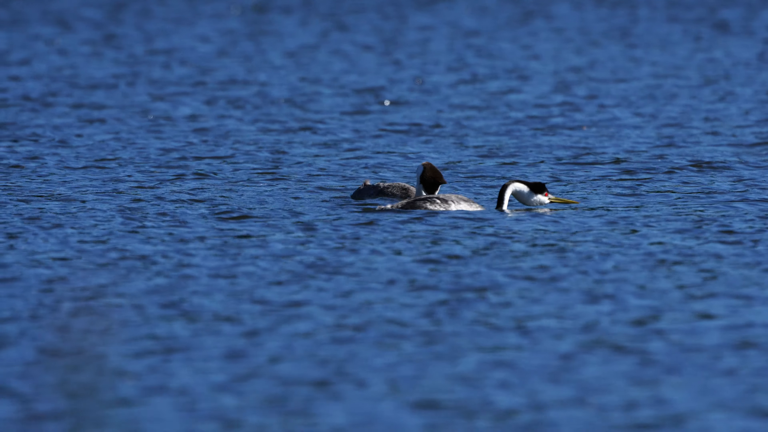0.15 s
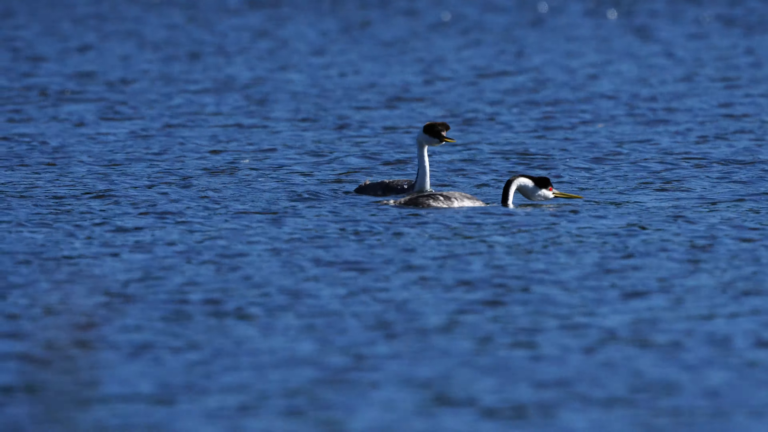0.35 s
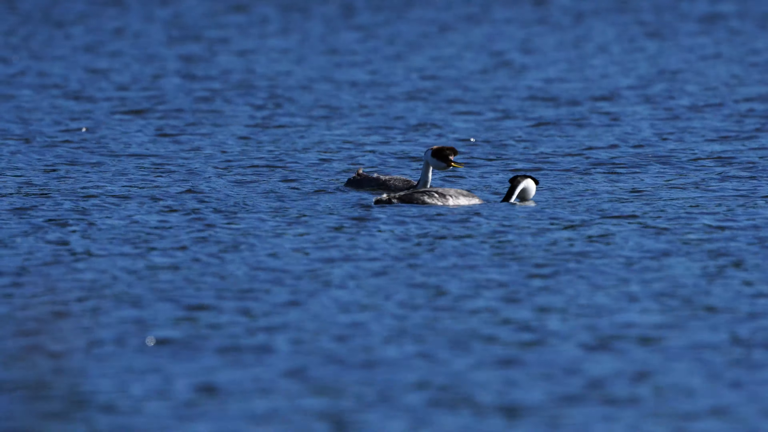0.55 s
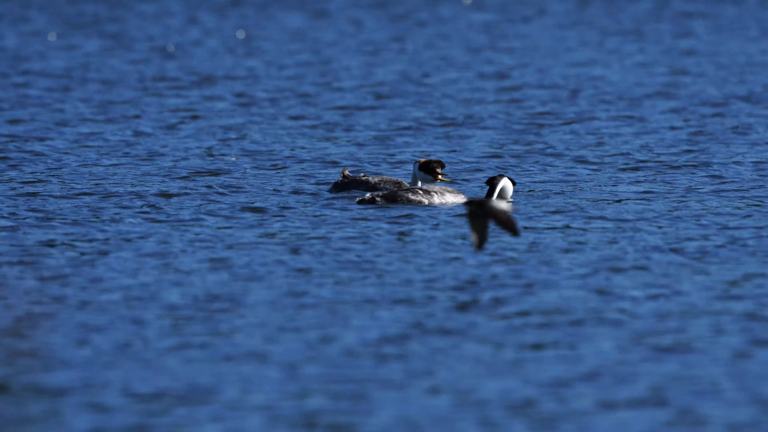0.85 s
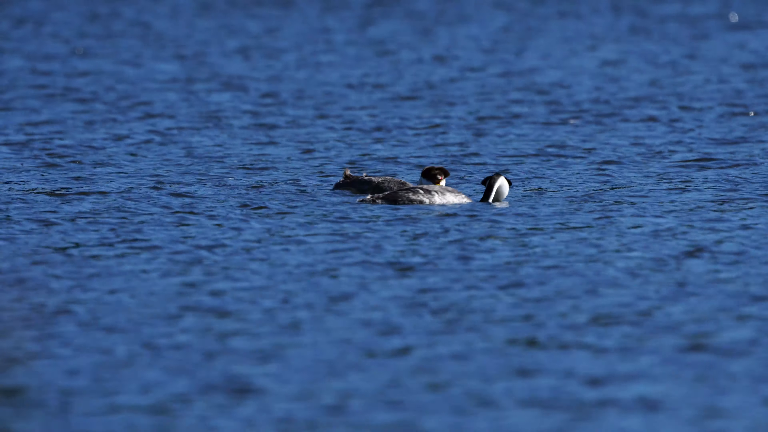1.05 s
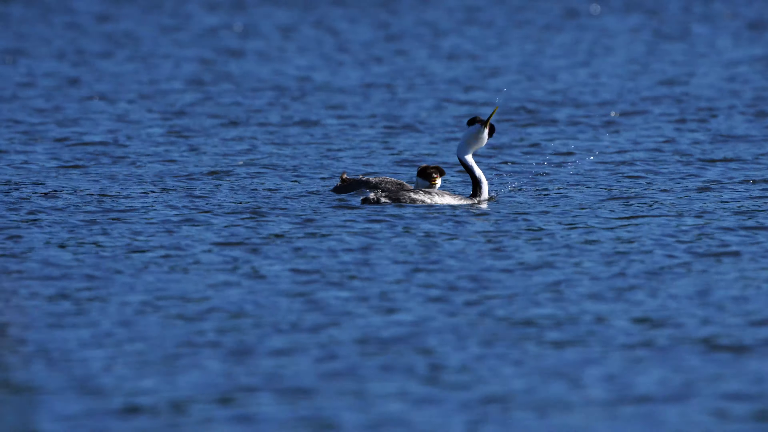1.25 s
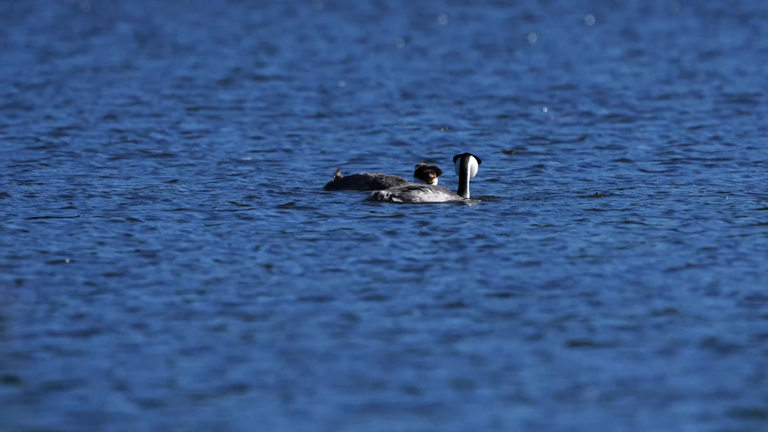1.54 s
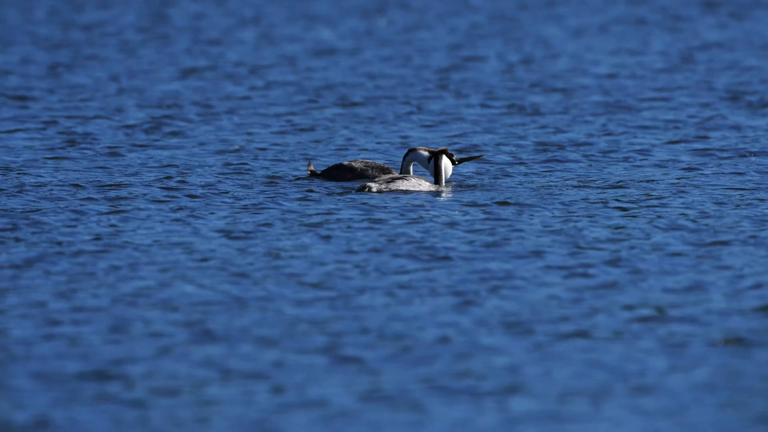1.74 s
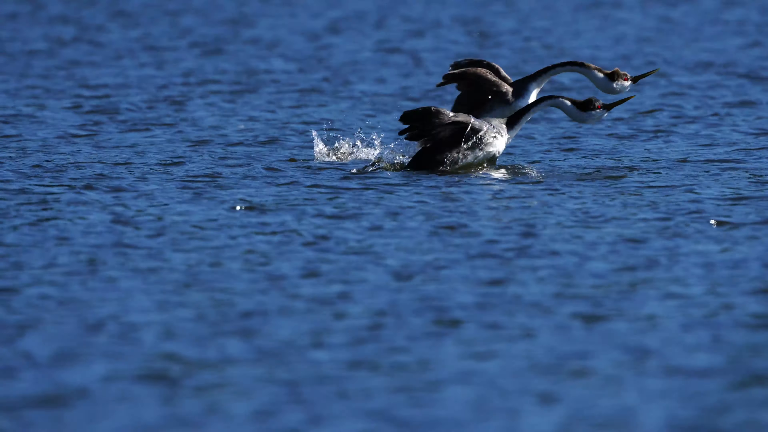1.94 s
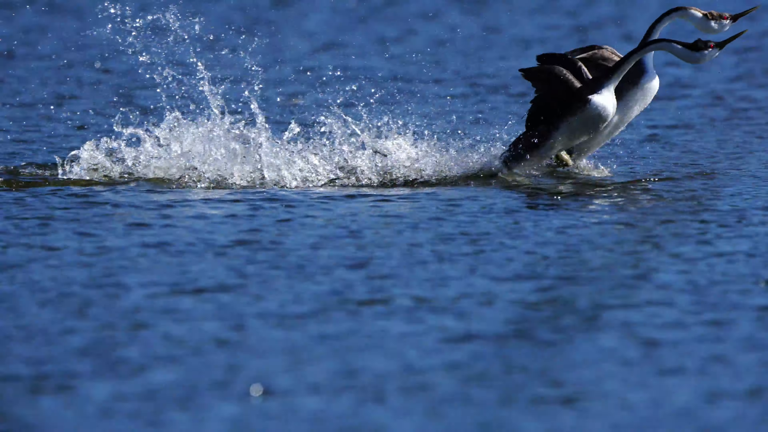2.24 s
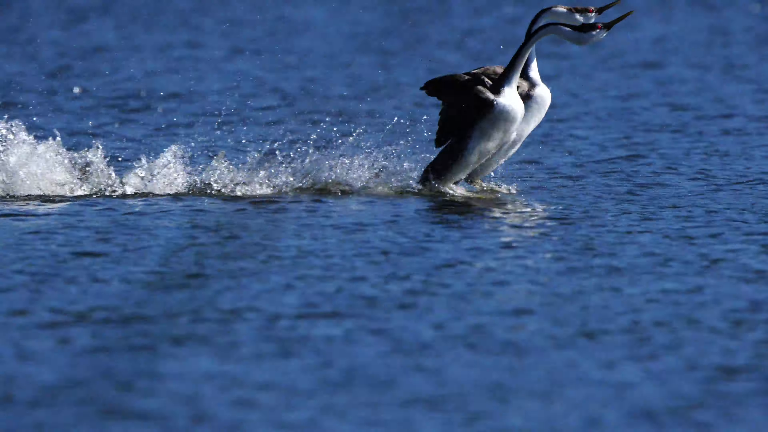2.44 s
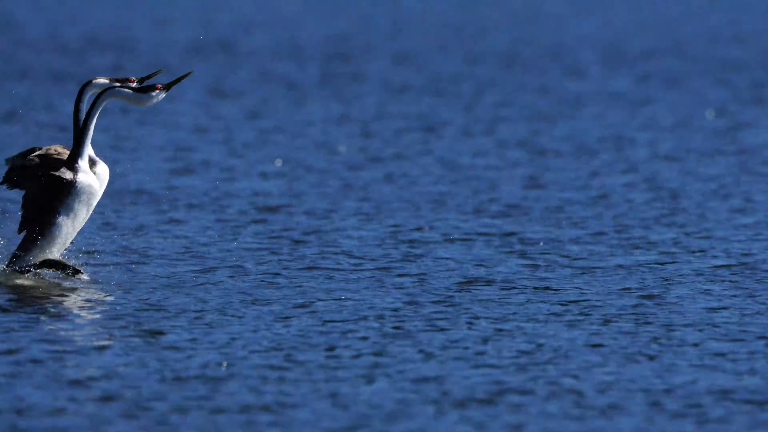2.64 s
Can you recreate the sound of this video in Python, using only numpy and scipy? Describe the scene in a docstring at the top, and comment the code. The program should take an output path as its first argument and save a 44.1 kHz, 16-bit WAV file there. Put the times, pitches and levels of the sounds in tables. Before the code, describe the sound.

On an open lake, waterbirds rattle in two bouts of dry clicking chirps with faint wavering calls farther off; the wind buffets an unshielded microphone throughout, and sharp foot slaps and fine spray close it.

```python
"""Rattling trills of grebes come first, over buffeting wind and the hiss of wavelets on an open lake.
Each trill is a run of tiny chirps, mostly rising: short tones with an octave above them.
Later the birds rear up and patter across the water: sharp noise slaps with splashes and falling drops.
Faint wavering notes come from farther out. The wind is shaped noise that hits the two microphone
ports a little out of step, with single pops of pressure; the hiss is wide, shaped noise."""
import sys
import numpy as np
from scipy import signal
from scipy.fft import rfft, irfft
from scipy.io import wavfile
from scipy.ndimage import uniform_filter1d

SR = 44100
rng = np.random.default_rng(int(sys.argv[2]) if len(sys.argv) > 2 else 0)


def transcribe(u):
    """Save the signal u as a 16-bit wav file named by the first command-line argument.

    u: samples, shape (n,) or (channels, n), limited to [-1, 1]; the rate is SR.
    q: integer samples, one column per channel.
    """
    v = np.clip(np.atleast_2d(u).T, -1, 1)
    q = np.round(v * 32767).astype(np.int16)
    wavfile.write(sys.argv[1], SR, q)


N = 123039
TIME = np.arange(N) / SR
HZ = np.fft.rfftfreq(N, 1 / SR)

# Levels in these tables are starting levels; the functions may raise or lower them.
# wavelet hiss, with a few brief dips: (time [s], level [dB])
HISS_LEVEL = [(0, -45), (.12, -41.5), (.16, -48.5), (.24, -44), (.45, -42.5), (.9, -41.5), (1.4, -38),
              (1.78, -38.5), (1.91, -42.5), (1.99, -40), (2.04, -45.5), (2.17, -38.5), (2.22, -44.5),
              (2.35, -41), (2.79, -39.5)]
# tone colour of the hiss: (frequency [Hz], relative level [dB])
HISS_COLOUR = [(100, -42), (500, 1.5), (900, 8.5), (1500, 4.5), (2500, 4), (4000, 2), (5500, -1.5),
               (6800, -3.5), (8500, -1), (10500, -2.5), (13000, -5), (15600, -4.5)]
# how alike the hiss is left and right: (frequency [Hz], likeness [-1 to 1])
HISS_LIKENESS = [(200, 1), (1400, 0.32), (3000, -0.25), (15000, 0.15)]
# deep sway of the air, even in the lulls: (frequency [Hz], relative level [dB])
SWAY_COLOUR = [(8, -18), (25, -4), (45, -2), (70, 1), (110, -16.5), (200, -38), (500, -49), (16000, -100)]
# steady push of the wind: (time [s], level [dB])
WIND_LEVEL = [(0, -28.5), (.06, -36), (.16, -28.5), (.23, -30), (.36, -33.5), (.52, -34), (.6, -41.5),
              (.7, -33), (.77, -25), (.85, -32.5), (.92, -28.5), (1.14, -28), (1.19, -35), (1.28, -29),
              (1.62, -27), (1.78, -26.5), (2.04, -28), (2.3, -26), (2.55, -25), (2.6, -25), (2.67, -26),
              (2.79, -28)]
# tone colour of the steady wind: (frequency [Hz], relative level [dB])
WIND_COLOUR = [(10, -21), (30, -5), (60, -2), (110, -0.5), (180, -4.5), (280, -9), (450, -19), (700, -27.5),
               (1200, -37), (3000, -53.5), (16000, -99)]
# gusts that hit the microphone: (centre time [s], half length [s], level [dB])
GUSTS = [(0.131, .022, -28.5), (0.775, 0.022, -28.5), (0.882, 0.012, -30), (0.939, 0.017, -31),
         (1.046, 0.012, -33.5), (1.125, 0.03, -37), (1.339, 0.026, -32), (1.411, 0.0057, -18.5),
         (1.721, 0.021, -32), (1.796, 0.025, -28), (1.878, 0.034, -25.5), (1.961, 0.011, -21.5),
         (2.021, 0.017, -20.5), (2.086, 0.021, -27.5), (2.241, 0.07, -26.5), (2.413, 0.0088, -28),
         (2.453, 0.0097, -26.5), (2.586, 0.017, -26.5), (2.744, 0.028, -33)]
# tone colour of the gusts: (frequency [Hz], relative level [dB])
GUST_COLOUR = [(25, -5), (80, -15), (160, 4), (300, -1), (480, -3.5), (680, -18.5), (900, -25), (1200, -63),
               (1600, -49), (3000, -72), (16000, -91)]
# lead of the left port over the right: (frequency [Hz], phase [radians])
PORT_PHASE = [(0, -0.71), (60, 0.1), (130, -0.98), (260, -1.31), (600, -2), (1120, -1.7)]
# strength of the left port over the right: (frequency [Hz], left minus right [dB])
PORT_BALANCE = [(60, 0), (150, -0.5), (380, 2.5), (700, 4.5), (1300, 16.5)]
# single eddies that pop against the ports: (centre time [s], level [dB], length [s])
POPS = [(.116, -13.5, 0.0011), (0.131, -14, 0.001), (0.144, -10, 0.00087), (.162, -9.5, .0018),
        (.741, -16, 0.0022), (0.759, -14.5, 0.00088), (0.774, -22, 0.0026), (0.786, -16.5, 0.0011),
        (0.801, -18.5, 0.001), (.934, -14, 0.0018), (0.965, -13, 0.00094), (1.043, -11, .0011),
        (1.109, -14, 0.0021), (1.152, -10, .0011), (1.239, -11, 0.0016), (1.329, -14, .001),
        (1.538, -13.5, 0.0014), (1.582, -10, 0.0014), (1.68, -11.5, 0.0017), (1.695, -13.5, 0.0012),
        (1.756, -16, 0.00067), (1.8, -18, 0.001), (1.836, -11.5, 0.002), (1.856, -8.5, 0.00071),
        (1.877, -6, 0.00078), (1.898, -15.5, 0.00069), (1.904, -9.5, 0.002), (1.95, -19, 0.0006),
        (1.968, -22, 0.00098), (2.013, -13, 0.00098), (2.02, -22, 0.0012), (2.031, -12, 0.00058),
        (2.089, -17, 0.0007), (2.138, -12, 0.0012), (2.192, -10.5, 0.00067), (2.2, -15.5, 0.00067),
        (2.206, -11, 0.0013), (2.212, -17, 0.00099), (2.222, -11.5, 0.0014), (2.254, -14.5, 0.0017),
        (2.266, -9.5, 0.00074), (2.273, -13, 0.00069), (2.281, -9, 0.0015), (2.361, -19, 0.00068),
        (2.415, -11.5, 0.0012), (2.453, -8.5, 0.00075), (2.461, -13, 0.00087), (2.577, -18, 0.00093),
        (2.585, -8.5, 0.0017), (2.593, -13, 0.0016), (2.6, -9.5, 0.0013), (2.631, -14.5, 0.0029),
        (2.699, -15, .002)]
# faint calls of birds farther off: (time [s], length [s], level [dB], pitch [Hz], wobble [radians])
FAR_CALLS = [(0.869, 0.034, -45, 1950, 2), (1.017, 0.035, -38, 1796, 1.3), (1.182, 0.04, -37.5, 1884, 1.2),
             (1.273, .018, -40.5, 1740, 1), (1.372, 0.036, -36, 1922, 1.4), (1.554, 0.015, -33, 2003, 0.49),
             (2.483, 0.04, -51, 5760, .8)]
# feet slapping the water: (time [s], level [dB], left minus right [dB])
SLAPS = [(2.026, -40, 0), (2.1408, -29.5, 4), (2.387, -35, -2), (2.411, -44, -2), (2.5474, -24, -7),
         (2.602, -27, -1), (2.6591, -24.5, -3), (2.719, -30, -5), (2.7743, -25.5, -2)]
# tone colour of slaps and drops: (frequency [Hz], relative level [dB])
SLAP_COLOUR = [(300, 3), (900, -4.5), (1800, -2), (2700, -10), (4200, -31), (9000, -32)]
# chirps of the trills: (time [s], length [s], level [dB], middle pitch [Hz], octave overtone [dB])
CHIRPS = [(0, 0.011, -26.5, 2350, -19), (0.0528, 0.0032, -28.5, 2460, -27),
          (0.0605, 0.0069, -28, 2230, -14), (0.072, 0.0022, -23, 2270, -23),
          (0.082, 0.0035, -30, 2370, -23), (0.0938, 0.0038, -20.5, 2350, -20.5),
          (0.103, 0.002, -28.5, 2870, -29), (0.1152, 0.0034, -31, 2140, -16),
          (0.124, 0.0058, -28.5, 2500, -26), (0.1471, 0.005, -28, 2270, -21),
          (0.1536, 0.0026, -23.5, 2530, -21), (0.1615, 0.0026, -30, 2750, -27),
          (0.1815, 0.0037, -28, 2550, -35), (0.188, 0.0031, -23, 2330, -21),
          (0.2112, 0.0016, -19.5, 2480, -16), (0.2176, 0.0083, -24.5, 2300, -22.5),
          (0.2447, 0.0041, -23, 2370, -18), (0.255, 0.0017, -24, 2670, -29),
          (0.2698, 0.0044, -27.5, 1940, -8.5), (0.2767, 0.0028, -20.5, 2390, -18),
          (0.28, 0.0041, -25, 2280, -20), (0.3162, 0.0032, -22.5, 2070, -19),
          (0.322, 0.0063, -28, 2240, -20), (0.36, 0.00076, -17.5, 2840, -24),
          (0.3686, 0.0017, -19.5, 2120, -17), (0.422, 0.0025, -27.5, 2280, -19),
          (0.426, 0.0018, -31, 2300, -15), (0.4566, 0.003, -27.5, 2290, -33),
          (0.4844, 0.004, -30.5, 2380, -26), (0.498, 0.0032, -35, 2540, -28),
          (0.502, 0.0027, -29, 2440, -32), (0.523, 0.0034, -27.5, 2200, -15),
          (0.564, 0.0026, -25.5, 2420, -28), (0.5881, 0.0045, -27.5, 2266, -17),
          (0.5934, 0.0052, -28, 2225, -13.5), (0.5995, 0.0031, -30, 2370, -18),
          (0.6014, 0.0022, -29.5, 2500, -22), (0.6534, 0.0042, -21, 2366, -22),
          (0.6628, 0.0046, -23.5, 2420, -22), (0.7275, 0.003, -22.5, 2080, -33),
          (0.7301, 0.0065, -27, 2320, -28), (0.738, 0.0036, -23, 2425, -31),
          (0.8343, 0.0049, -21.5, 2403, -42), (1.215, 0.0046, -25.5, 2230, -19),
          (1.2209, 0.0084, -23.5, 2296, -20), (1.237, 0.0037, -22.5, 2260, -26),
          (1.2455, 0.0032, -24, 2360, -26), (1.2733, 0.0029, -22, 2260, -23),
          (1.2776, 0.0041, -29, 2160, -19), (1.282, 0.0037, -26, 2300, -19), (1.285, 0.002, -30, 2300, -6),
          (1.311, 0.0046, -24, 2435, -15), (1.34, 0.0044, -31, 2560, -16),
          (1.343, 0.0023, -28, 2580, -10.5), (1.3667, 0.0027, -20, 2600, -19),
          (1.3748, 0.0033, -24, 2740, -23), (1.3942, 0.005, -26, 2500, -26),
          (1.4, 0.0042, -29.5, 2300, -11), (1.4026, 0.0048, -24.5, 2550, -21),
          (1.4247, 0.0034, -24, 2760, -19), (1.429, 0.0058, -26, 2260, -20),
          (1.433, 0.0026, -21.5, 2660, -19), (1.452, 0.0038, -24, 2510, -20),
          (1.458, 0.0051, -24, 2570, -15.5), (1.473, 0.0031, -27, 2300, -19),
          (1.483, 0.0095, -28.5, 2647, -12), (1.515, 0.0016, -14.5, 2460, -17),
          (1.5215, 0.0041, -24, 2640, -12), (1.534, 0.0018, -19, 2650, -16),
          (1.55, 0.0022, -16, 2450, -13.5), (1.5582, 0.0033, -20.5, 2730, -12.5),
          (1.5862, 0.0038, -20.5, 2300, -14), (1.5943, 0.0029, -18, 2460, -15),
          (1.6222, 0.0035, -18.5, 2350, -17), (1.632, 0.0022, -18.5, 2550, -14),
          (1.6378, 0.0031, -22, 2340, -20), (1.6593, 0.0035, -18.5, 2300, -13.5),
          (1.6676, 0.0031, -19.5, 2450, -16), (1.705, 0.0044, -21, 2224, -11.5),
          (1.709, 0.0071, -26, 2310, -29), (1.762, 0.0029, -38, 2470, -17),
          (1.7703, 0.0032, -19, 2216, -28), (1.774, 0.0056, -22.5, 2370, -26),
          (1.779, 0.0045, -25, 2550, -20), (1.8573, 0.0035, -20.5, 2270, -25),
          (1.8594, 0.0096, -25, 2366, -22.5), (1.868, 0.0024, -20.5, 2580, -29)]
# tone colour the throat gives the chirps: (frequency [Hz], relative level [dB])
THROAT_COLOUR = [(900, -31), (1500, -2), (1950, -2.5), (2500, 1), (2850, 4), (3300, -2.5), (3900, 2),
                 (4500, -3), (5400, 0), (5950, -8), (8000, -16)]


def amp(db):
    """Turns decibels into a gain."""
    return 10 ** (np.asarray(db) / 20)


def unit(x):
    """Scales a sound to an average (rms) strength of 1."""
    return x / np.sqrt(np.mean(x ** 2) + 1e-20)


def over_hz(points):
    """Reads a table at every frequency, in straight lines on a log-frequency axis."""
    f, value = np.transpose(points)
    return np.interp(np.log(HZ + 1), np.log(f + 1), value)


def over_time(points):
    """Reads a table at every moment, in straight lines between its points."""
    return np.interp(TIME, *np.transpose(points))


def tint(x, colour):
    """Gives a sound the tone colour in a table."""
    return irfft(rfft(x) * amp(over_hz(colour)), N)


def wander(rate_hz):
    """Makes a smooth random curve of rms 1 by keeping only the slow part of noise."""
    smoothed = rfft(rng.standard_normal(N)) * np.exp(-(HZ / rate_hz) ** 2)
    return unit(irfft(smoothed, N))


def add(mix, s, sound):
    """Mixes a sound in at time s [s]."""
    part = mix[max(round(s * SR), 0):][:len(sound)]
    part += sound[:len(part)]


def wavelets():
    """Fine hiss from the rippled lake: flickering noise that differs between left and right."""
    left, other = rfft(rng.standard_normal((2, N)) * amp(0.99 * wander(120)))
    same = np.clip(over_hz(HISS_LIKENESS), -1, 1)
    right = same * left + np.sqrt(1 - same ** 2) * other
    pair = irfft(np.array([left, right]) * amp(over_hz(HISS_COLOUR)), N)
    return amp(over_time(HISS_LEVEL)) * unit(pair)


def port_lean():
    """Gain and phase of the left port; the right one gets the inverse."""
    return amp(over_hz(PORT_BALANCE) / 2) * np.exp(.5j * over_hz(PORT_PHASE))


def eddies(colour, lumps_db, lumps_hz):
    """Lumpy turbulence that reaches the two ports a little out of step, evened out over time."""
    a, b = rfft(rng.standard_normal((2, N)) * amp(lumps_db * wander(lumps_hz)))
    same = .94  # likeness of the two ports
    lean = port_lean()
    left = a * lean
    right = (same * a + np.sqrt(1 - same ** 2) * b) / lean
    pair = irfft(np.array([left, right]) * amp(over_hz(colour)), N)
    # dividing by the slow strength keeps only the fast lumps
    power = uniform_filter1d((pair ** 2).mean(0), size=1500)
    power = uniform_filter1d(power, size=1500)
    return pair / np.sqrt(power + 1e-20)


def wind():
    """A deep sway, a low rumble that follows the wind, and brighter buffets at each gust."""
    rumble_trim_db, buffet_trim_db, sway_db = 1.5, 4, -36
    # each gust swells and sinks as a bell curve; their powers add
    gust_power = sum(amp(db) ** 2 * np.exp(-((TIME - s) / half) ** 2) for s, half, db in GUSTS)
    rumble = amp(over_time(WIND_LEVEL) + rumble_trim_db) * eddies(WIND_COLOUR, lumps_db=4, lumps_hz=95)
    buffets = amp(buffet_trim_db) * np.sqrt(gust_power) * eddies(GUST_COLOUR, lumps_db=8.5, lumps_hz=157)
    sway = amp(sway_db) * unit(tint(rng.standard_normal(N), SWAY_COLOUR))
    return rumble + buffets + sway


def pops():
    """Brief pushes and pulls of pressure as single eddies cross the ports."""
    out, trim_db = np.zeros(N), 0.3
    turns = rng.uniform(0, 2 * np.pi, len(POPS))  # sets how push and pull are balanced
    for (s, db, length), turn in zip(POPS, turns):
        u = (TIME - s) / length
        pulse = (np.exp(1j * turn) / (1 + .5j * u) ** 4).real
        out += amp(db + trim_db) * pulse
    lean = port_lean()
    return irfft(rfft(out) * np.array([lean, 1 / lean]), N)


def lake(x):
    """Direct bird sound, a close reflection in each ear and a thin scatter from water and shore."""
    scatter_db, scatter_t60_s = -13.5, .16  # t60: time to fall by 60 dB
    echo_s, echo_db, pan_db = 0.002634, -4.5, 0.7
    t = np.arange(SR // 2) / SR
    hits = rng.random((2, len(t))) < 3000 / SR  # 3000 chances a second
    fade = amp(-60 * t / scatter_t60_s) * (t > .004)
    taps = rng.standard_normal((2, len(t))) * hits * fade
    scatter = amp(scatter_db) * taps / np.linalg.norm(taps, axis=1, keepdims=True)
    # the direct sound is stronger on the right but reaches it 0.03 ms later
    ear_delays = np.array([[0], [.00003]])
    near = amp([[-pan_db], [pan_db]]) * np.exp(-2j * np.pi * HZ * ear_delays)
    echo_delays = echo_s * np.array([[0.901], [1.0]])
    echo = amp(echo_db) * np.exp(-2j * np.pi * HZ * echo_delays)
    direct = irfft(rfft(x) * (near + echo), N)
    return direct + signal.fftconvolve(x[None], scatter, axes=1)[:, :N]


def far_calls():
    """Short wavering notes from farther out, some hoarser; the pitch sags as each one ends."""
    sag_hz, flutter_depth, octave_db = 220, .45, -14
    out, hoarse, flutter = np.zeros(N), wander(170), wander(390)
    for s, length, db, hz, wobble in FAR_CALLS:
        along = np.clip((TIME - s) / length, 0, 1)
        pitch = hz - sag_hz * along ** 2
        phase = 2 * np.pi * np.cumsum(pitch) / SR + wobble * hoarse
        swell = np.sqrt(abs(np.sin(np.pi * along))) * (1 + flutter_depth * flutter)
        out += amp(db) * swell * (np.sin(phase) + amp(octave_db) * np.sin(2 * phase))
    return out


def feet():
    """Sharp slaps with a short noise splash, and drops of spray falling back."""
    slap_trim_db, snap_db, slap_decay_s = 4, 23, 0.00083
    splash_db, splash_decay_s = -10, 0.008
    drops_per_s, drops_db, run_start_s = 380, -59, 1.95
    out, t = np.zeros((2, N)), np.arange(0, .06, 1 / SR)
    snap = amp(snap_db) * (t == 0)  # one-sample click
    for s, db, pan_db in SLAPS:
        fade = np.exp(-t / slap_decay_s) + amp(splash_db) * np.exp(-t / splash_decay_s)
        splash = rng.standard_normal(len(t)) * fade
        for ear, side in zip(out, (.5, -.5)):
            add(ear, s, amp(db + slap_trim_db + side * pan_db) * (snap + splash))
    drops = (rng.random((2, N)) < drops_per_s / SR) * rng.standard_normal((2, N))
    spray = amp(drops_db) * unit(tint(drops, SLAP_COLOUR))
    fade_in = np.clip((TIME - run_start_s) / 0.23, 0, 1)
    return tint(out, SLAP_COLOUR) + spray * fade_in


def trills():
    """Each chirp scoops up into a gliding, fading tone; a hoarse octave follows a moment later."""
    trim_db, octave_trim_db, octave_lag_s = 0.5, 3, 0.00013
    glide_hz, glide_spread, scoop_hz, scoop_s = 200, 1.1, 250, .0008
    rise_s, fall_s, fade_db = 0.0011, 0.00098, 3.5
    rasp_depth, octave_rasp, hoarse_db, hoarse_ratio = 0.095, .3, -6.5, 1.4
    smooth = max(int(SR / 927), 2)  # samples averaged to slow the random roughness
    out, t = np.zeros(N), np.arange(0, .02, 1 / SR)
    for s, length, db, hz, octave_db in CHIRPS:
        noises = rng.standard_normal((3, len(t)))
        rasp, shake, grit = (unit(uniform_filter1d(z, smooth)) for z in noises)
        along = np.minimum(t / length, 1) - .5  # -0.5 at the start, 0.5 at the end
        glide = glide_hz * (1 + glide_spread * rng.standard_normal()) * along
        pitch = hz + glide - scoop_hz * np.exp(-t / scoop_s)
        phase = 2 * np.pi * (np.cumsum(pitch) / SR + rng.random()) + rasp_depth * rasp
        rise = np.sin(np.pi / 2 * np.clip(t / rise_s, 0, 1)) ** 2
        fall = np.sin(np.pi / 2 * np.clip((length - t) / fall_s / 2 + .5, 0, 1)) ** 2
        swell = rise * fall * amp(-fade_db * along) * (1 + rasp_depth * shake)
        octave = np.sin(2 * phase + octave_rasp * shake)
        hoarse = amp(hoarse_db) * grit * np.sin(hoarse_ratio * phase + rasp)
        top = (octave + hoarse) * np.interp(t - octave_lag_s, t, swell)
        chirp = swell * np.sin(phase) + amp(octave_db + octave_trim_db) * top
        add(out, s, amp(db + trim_db) * chirp)
    return out


def scene():
    """Water, wind and birds together; only the bird voices get the lake's reflections."""
    voices = lake(tint(trills(), THROAT_COLOUR) + far_calls())
    return voices + feet() + wavelets() + wind() + pops()


def record(dry):
    """Softly rounds off the loudest peaks, then removes the treble above the band edge."""
    overload, edge_hz = .62, 15880  # overload: level the rounding closes in on
    rounded = overload * np.tanh(dry / overload)
    lowpass = signal.firwin(511, edge_hz, window=("kaiser", 9), fs=SR)
    return signal.oaconvolve(rounded, lowpass[None], "same")


dry = scene()
out = record(dry)
transcribe(out)
```